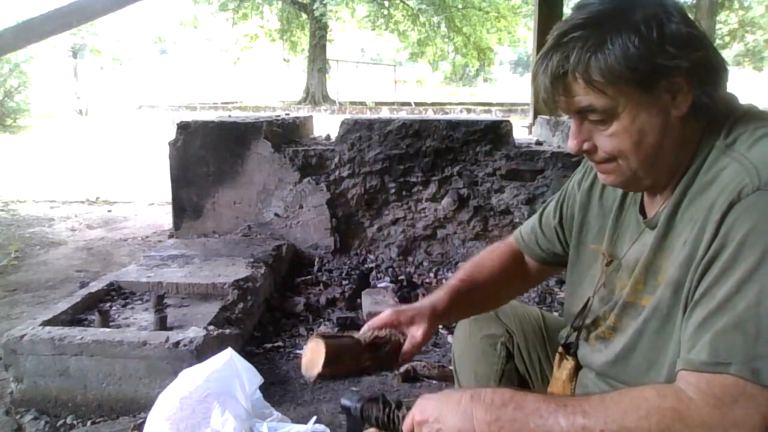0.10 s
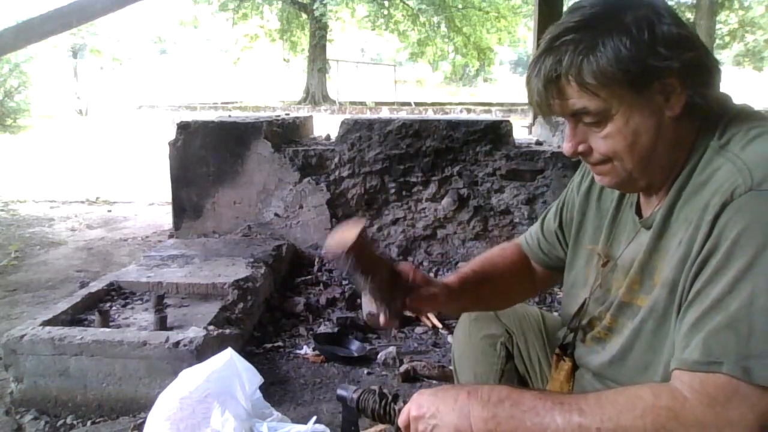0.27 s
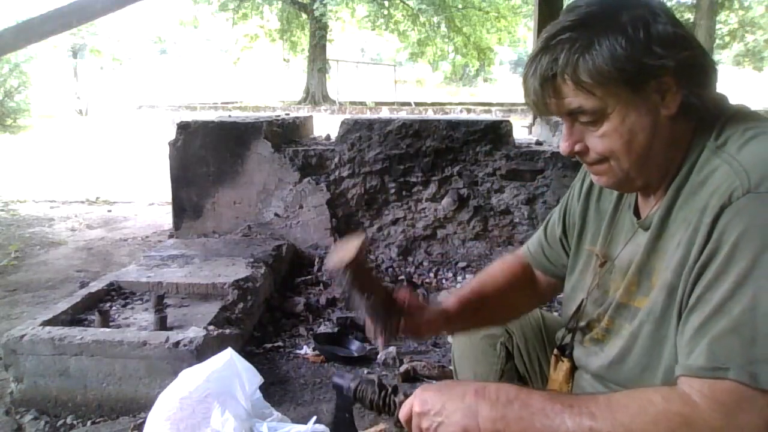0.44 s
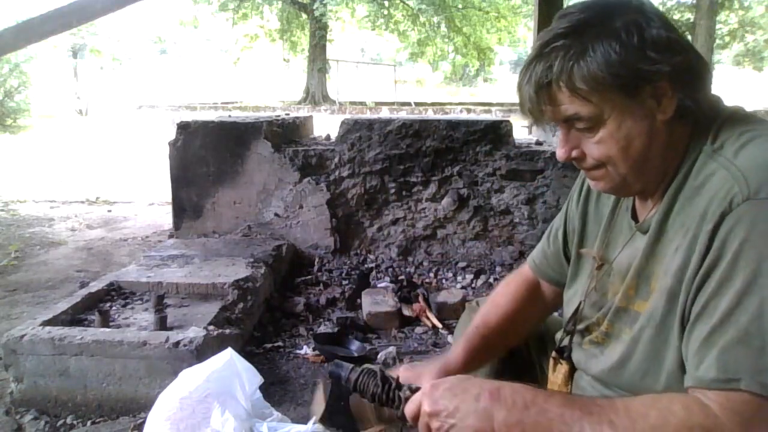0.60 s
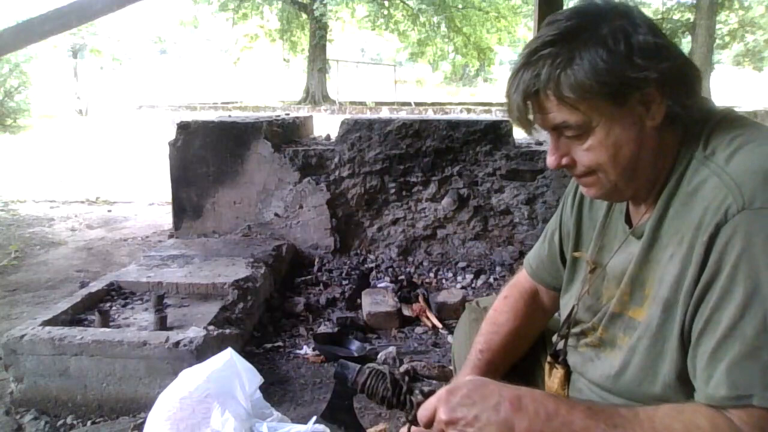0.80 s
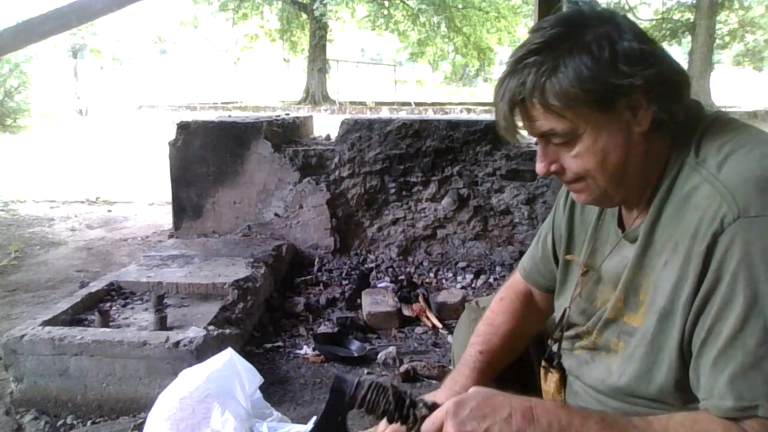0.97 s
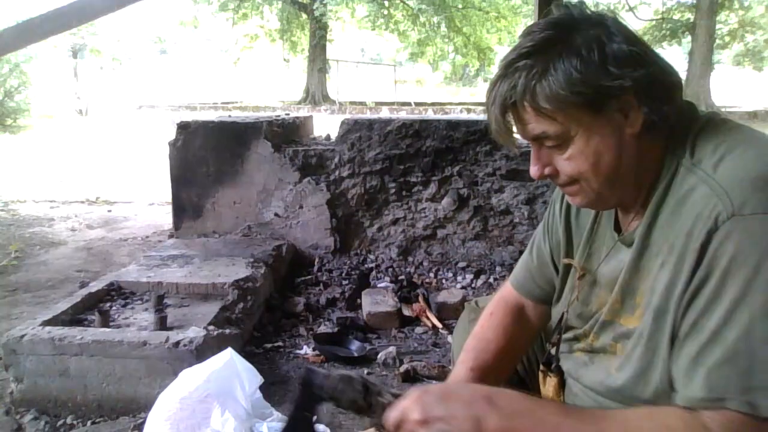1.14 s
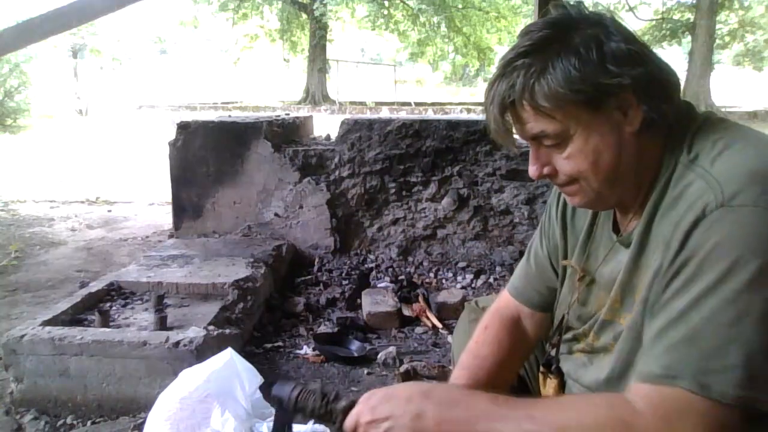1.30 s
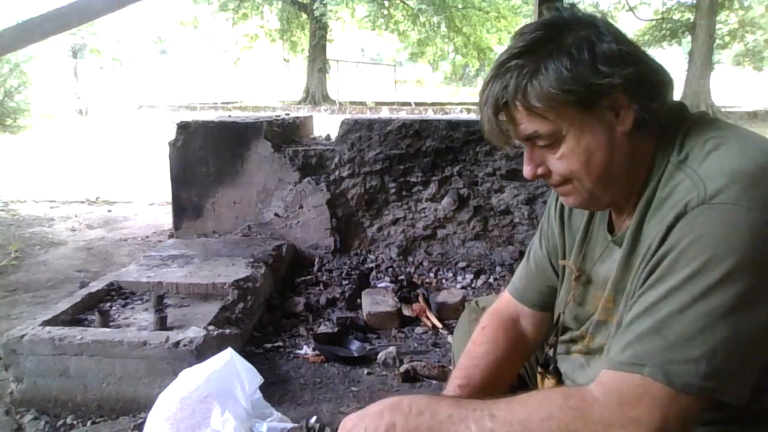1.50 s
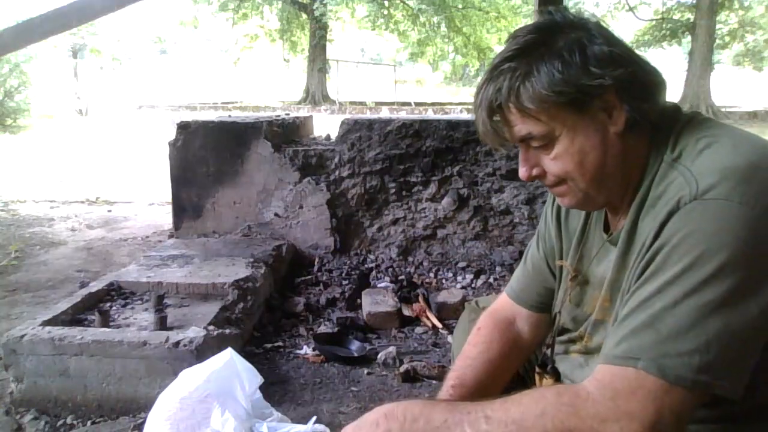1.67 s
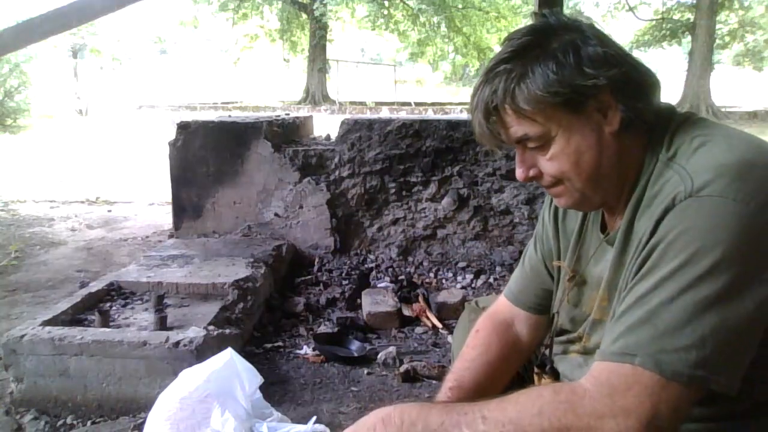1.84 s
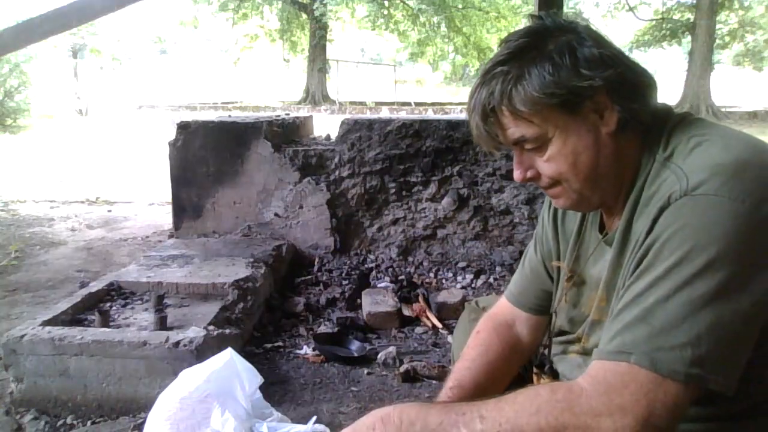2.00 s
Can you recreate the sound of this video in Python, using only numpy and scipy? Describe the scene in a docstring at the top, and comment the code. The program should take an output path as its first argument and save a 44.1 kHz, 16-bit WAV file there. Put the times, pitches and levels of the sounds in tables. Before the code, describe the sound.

Close, hard wood crack with a thin high steel ring and quick reflections from roof and walls, fading into trees; afterwards quiet handling of bark and gear, soft insect buzz, faint bird and distant motor hum outdoors.

```python
"""Wooden club on a steel blade

One hard knock close to the microphone, under the roof of an open shelter: damped wood modes and a noise crack.
The steel rings on two thin decaying sines; delayed copies echo off roof and walls, decaying noise is the tail.
Bark and gear then tick, thud and rustle, made from noise grains and tiny clicks.
Behind: cicadas as pulsed treble noise, a bird as soft noise notes, a motor as narrow noise, and shaped air noise."""
import sys
import numpy as np
from scipy import signal
from scipy.fft import rfft, irfft
from scipy.io import wavfile
from scipy.ndimage import uniform_filter1d, map_coordinates

SR = 44100
rng = np.random.default_rng(int(sys.argv[2]) if len(sys.argv) > 2 else 0)


def level_to_linear(level):
    """Convert decibel levels to linear amplitude factors, elementwise."""
    exponent = np.asarray(level, float) / 20
    return 10 ** exponent


def inscribe(sig):
    """Save sig as 16-bit PCM at rate SR to the path in sys.argv[1].

    A 1-D sig is mono; a 2-D sig holds one channel per row.
    Samples are clipped to [-1, 1] before scaling.
    """
    pcm = np.round(np.clip(np.atleast_2d(sig).T, -1, 1) * 32767)
    wavfile.write(sys.argv[1], SR, pcm.astype(np.int16))


N = 92610  # samples, 2.1 s
t = np.arange(N) / SR


def unit(x):
    """Scale to rms 1."""
    return x / np.sqrt(np.mean(x ** 2))


def band(x, hz, width_hz):
    """Resonant band-pass."""
    return signal.lfilter(*signal.iirpeak(hz, hz / width_hz, fs=SR), x)


def coloured(table):
    """Noise of rms 1 whose spectrum follows (f/Hz, level/dB) points over log frequency."""
    hz, db = np.array(table).T
    f = np.maximum(np.arange(N // 2 + 1) * SR / N, 1)
    gain = level_to_linear(np.interp(np.log(f), np.log(hz), db))
    return unit(irfft(rfft(rng.standard_normal(N)) * gain, N))


def fade(start, t60, rise=.0002):
    """Envelope that rises at start, then dies 60 dB in t60 seconds."""
    age = np.maximum(t - start, 0)
    return (1 - np.exp(-age / rise)) * level_to_linear(-60 * age / t60)


def walk(rate):
    """Slow random drift of rms 1, with about rate new targets per second."""
    k = int(SR / rate)
    steps = np.repeat(rng.standard_normal(N // k + 1), k)
    smooth = uniform_filter1d(uniform_filter1d(steps, k), k)
    return unit(smooth[:N])


# contacts of the blow: t/s, push on the wood/dB, splinter crack/dB
CONTACTS = [(0.0785, -17, -17), (0.0796, -9, -29), (0.0799, -21, -10)]
# modes of club and log: f/Hz, relative level/dB, t60/s
WOOD_MODES = [(229, -24, .04), (453, -7.5, .05), (765, -12.5, 0.033), (1030, 0, .03), (1285, -4.5, .02),
              (1860, -24, .02), (2602, -3, .02), (3020, -7, 0.016), (3980, -21, .01), (5920, -7, .01)]
# spectrum of the splinter crack: f/Hz, relative level per Hz/dB
CRACK_SPECTRUM = [(1500, -30), (4000, -8.5), (6000, 0), (7500, -5.5), (10000, -2.5), (14000, -1),
                  (17000, -3.5)]
CRACK_T60_S = .007
# the club comes to rest on the log and chokes the modes above CHOKE_HZ
CHOKE_S, CHOKE_T60_S, CHOKE_HZ = .0811, .003, 600
RADIATES_HZ = 234  # small wood sends out little bass below this


def blow():
    """Each contact rings the damped modes of the wood and throws a crack of splinters."""
    hiss, out = coloured(CRACK_SPECTRUM), 0
    choke = level_to_linear(-60 * np.maximum(t - CHOKE_S, 0) / CHOKE_T60_S)
    for s, push_db, crack_db in CONTACTS:
        ring = 0
        for hz, db, t60 in WOOD_MODES:
            mode = level_to_linear(db) * fade(s, t60, rise=.00005) * np.sin(2 * np.pi * hz * (t - s))
            ring = ring + mode * (choke if hz > CHOKE_HZ else 1)
        crack = level_to_linear(crack_db) * fade(s, CRACK_T60_S) * hiss
        out = out - level_to_linear(push_db) * ring + crack
    return signal.sosfilt(signal.butter(2, RADIATES_HZ, "high", fs=SR, output="sos"), out)


# steel tones: f/Hz, level before the swell/dB, t60/s
STEEL_TONES = [(9546, -27.5, .17), (14470, -22.5, 0.087)]
STEEL_FREE_S, STEEL_RISE_S = .083, .0048  # the club lifts and frees the blade


def steel():
    """Two thin tones swell as the blade comes free, then die away."""
    out = 0
    for hz, db, t60 in STEEL_TONES:
        out = out + level_to_linear(db) * fade(STEEL_FREE_S, t60, STEEL_RISE_S) * np.sin(2 * np.pi * hz * t)
    return out


# single echoes off roof and walls: delay/s, level/dB, low-pass f/Hz
ECHOES = [(.0047, -18, 2479), (0.0143, -14, 2985), (.020, -22, 2500), (0.025, -21, 2000),
          (0.034, -21, 1500)]


def echoes(x):
    """Direct sound plus a few delayed, duller copies from walls and roof."""
    out = x
    for delay, db, hz in ECHOES:
        late = map_coordinates(x, [(t - delay) * SR], order=1)
        out = out + level_to_linear(db) * signal.lfilter(*signal.butter(2, hz, fs=SR), late)
    return out


# scattered echo by half octaves: f/Hz, shelter level/dB, shelter t60/s, trees level/dB, trees t60/s
# (levels before the rise)
SCATTER = [(161, -47, 0.13, -58, .45), (240, -37, 0.1832, -49, 0.5), (339.9, -40, .2, -44, 0.35),
           (467, -38, .16, -50, 0.37), (712, -30.5, .16, -48, 0.43), (933, -33, .2, -40.5, 0.43),
           (1340, -34, .2, -47, .4), (1900, -34, .2, -48.5, .4), (2703, -39, .17, -52.5, 0.36),
           (3794, -39.5, .18, -55, .42), (5600, -45, .2, -56, .42), (7597, -42, .16, -50, .4),
           (11000, -38, 0.082, -59, .3), (14410, -35.5, 0.049, -63, .3)]
SHELTER_RISE_S = .003
TREES_DELAY_S, TREES_RISE_S = .06, .06


def shelter():
    """Scattered tail of the blow: the shelter answers at once, the trees around it later."""
    out, start = 0, CONTACTS[-1][0]
    for hz, near_db, near_t60, far_db, far_t60 in SCATTER:
        near = level_to_linear(near_db) * fade(start, near_t60, SHELTER_RISE_S)
        far = level_to_linear(far_db) * fade(start + TREES_DELAY_S, far_t60, TREES_RISE_S)
        edges = hz * 2 ** np.array([-.25, .25])
        half_octave = signal.butter(2, edges, "band", fs=SR, output="sos")
        out = out + (near + far) * unit(signal.sosfilt(half_octave, rng.standard_normal(N)))
    return out


def bursts(table):
    """Short dying grains of noise, each rung twice through its resonance."""
    out = np.zeros(N)
    noise = rng.standard_normal((len(table), 6000))
    for (s, db, hz, width_hz, t60), row in zip(table, noise):
        i = int(s * SR)
        rung = band(band(row, hz, width_hz), hz, width_hz)[1000:]  # skip the filter's build-up
        grain = unit(rung) * level_to_linear(db) * fade(0, t60)[:5000]
        out[i:i + 5000] += grain[:N - i]
    return out


# dry ticks: t/s, noise level before the envelope/dB, centre f/Hz, width of each resonance/Hz, t60/s
TICKS = [(.222, -43, 6000, 5000, 0.016), (.238, -56, 5200, 2500, .012), (.8228, -53.5, 3520, 6960, .015),
         (.8792, -54, 4530, 5000, .015), (.893, -57.5, 4500, 3000, 0.017), (.9201, -52.5, 6100, 3000, .015),
         (.998, -60.5, 2530, 400, 0.045), (1.0064, -55, 3180, 3500, 0.016), (1.0912, -58, 3500, 4000, .01),
         (1.116, -64, 1800, 200, 0.096), (1.127, -58.5, 2200, 3000, 0.018), (1.505, -57, 4500, 4000, .015),
         (1.5866, -58.5, 3500, 3000, 0.0123), (1.598, -62.5, 1980, 1200, 0.034),
         (1.6409, -55, 5500, 5000, 0.012), (1.650, -43, 6300, 4000, 0.011),
         (1.6549, -41, 6300, 2500, 0.017), (1.6555, -59, 3360, 1480, 0.019),
         (1.667, -39, 9000, 4000, 0.0067), (1.6724, -47.5, 6040, 2200, 0.015),
         (1.6724, -60.5, 3500, 1200, 0.042), (2.054, -57.5, 4000, 2500, .012),
         (2.0725, -45, 5460, 6000, .01)]


def ticks():
    """Dry ticks of bark and gear: brief resonant noise grains."""
    return bursts(TICKS)


# soft thuds: t/s, noise level before the envelope/dB, centre f/Hz, width of each resonance/Hz, t60/s
THUDS = [(.822, -59.5, 322, 396, 0.11), (1.126, -66, 400, 600, 0.046)]


def thuds():
    """Soft thuds of something set down: low resonant noise grains."""
    return bursts(THUDS)


# fine crackle: t/s, level/dB
RUSTLE_LEVEL = [(.0, -110), (.78, -105), (.84, -74.5), (1.0, -75), (1.132, -75.5), (1.3, -76), (1.5, -72),
                (1.62, -83), (1.66, -65), (1.71, -89), (1.949, -91), (2.049, -68), (2.1, -69)]
RUSTLE_HZ, RUSTLE_WIDTH_HZ, RUSTLE_PER_S = 3797, 2800, 1000  # the last is the mean click rate


def rustle():
    """Hands among bark and gear: dense tiny clicks of uneven size in one broad resonance."""
    hits = rng.random(N) < RUSTLE_PER_S / SR
    clicks = hits * rng.standard_normal(N) * level_to_linear(1.2 * rng.exponential(size=N))
    s, db = np.array(RUSTLE_LEVEL).T
    return level_to_linear(np.interp(t, s, db)) * unit(band(clicks, RUSTLE_HZ, RUSTLE_WIDTH_HZ))


# near cicadas, before drift: pulse rate at start/Hz, at end/Hz, level/dB, centre f/Hz, resonance width/Hz
SINGERS = [(88, 85.4, -57.5, 10000, 3500), (92.8, 93, -58, 14000, 2500), (97.2, 97, -61, 8900, 2500)]
PULSE_SHARE = .3  # decay constant of a pulse, as a share of its cycle


def cicadas():
    """Near singers: treble noise pulsed once a cycle, ringing in the body, rate and level drifting."""
    out = 0
    for start, end, db, hz, width_hz in SINGERS:
        rate = np.linspace(start, end, N) * (1 + .0048 * walk(3))
        phase = (np.cumsum(rate) / SR + rng.random()) % 1
        pulses = np.exp(-phase / PULSE_SHARE) * rng.standard_normal(N)
        body = band(band(pulses, hz, width_hz), hz, width_hz)
        body = band(body, hz, 2 * width_hz)
        out = out + level_to_linear(db + 1.5 * walk(5)) * unit(body)
    return out


# faint hoarse calls: start t/s, length/s, level/dB, f/Hz
CALLS = [(0.98, 0.11, -75, 1420), (1.155, .16, -76.5, 1417), (1.335, 0.134, -78.5, 1394),
         (1.97, .1, -73, 1420)]
CALL_WIDTH_HZ, CALL_EDGE_S = 150, .025  # width of each of two resonances


def far_bird():
    """Narrow breathy notes of noise with soft edges."""
    out = 0
    for s, length, db, hz in CALLS:
        shape = np.clip(np.minimum(t - s, s + length - t) / CALL_EDGE_S, 0, 1)
        breath = band(band(rng.standard_normal(N), hz, CALL_WIDTH_HZ), hz, CALL_WIDTH_HZ)
        out = out + level_to_linear(db) * shape * unit(breath)
    return out


MOTOR_HZ, MOTOR_DB, MOTOR_WIDTH_HZ = 98.5, -68.5, 9.44


def motor():
    """Far motor: noise through a narrow resonance makes a wavering hum."""
    return level_to_linear(MOTOR_DB) * unit(band(rng.standard_normal(N), MOTOR_HZ, MOTOR_WIDTH_HZ))


# spectrum of far chorus, leaves and far traffic: f/Hz, relative level per Hz/dB
AIR_SPECTRUM = [(13, -30.5), (24, -2.5), (45, -2.5), (70, -12), (100, -5), (123, -13), (200, -15),
                (250, -21.5), (634, -30.5), (1140, -28.5), (2000, -30.5), (4690, -32), (7000, -19.5),
                (9920, -6), (15500, -11), (16800, -37)]
AIR_DB = -50  # middle level of the throb


def air():
    """Far chorus and rumble: shaped noise, its level gently throbbing at random."""
    return level_to_linear(AIR_DB + .34 * walk(11)) * coloured(AIR_SPECTRUM)


def scene():
    """All sources at one microphone."""
    hands = ticks() + thuds() + rustle()
    struck = echoes(blow()) + steel() + shelter()
    background = cicadas() + far_bird() + motor() + air()
    return (struck + hands + background)[None]


def top_cut(x):
    """Nothing passes above the cut-off."""
    return signal.sosfilt(signal.butter(12, 16970, fs=SR, output="sos"), x)


def record(dry):
    """A steep low-pass cuts the top of the mix above 15.9 kHz."""
    low_pass = signal.ellip(8, .2, 60, 15900, fs=SR, output="sos")
    mix = signal.sosfilt(low_pass, dry)
    return top_cut(mix)


dry = scene()
out = record(dry)
inscribe(out)
```